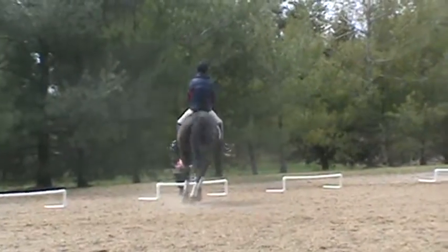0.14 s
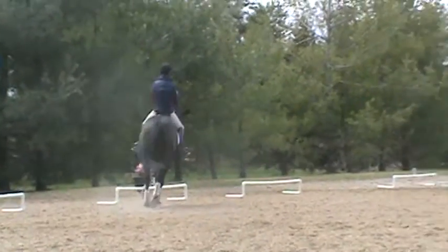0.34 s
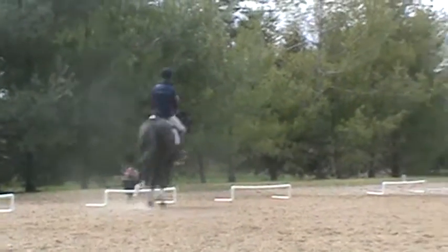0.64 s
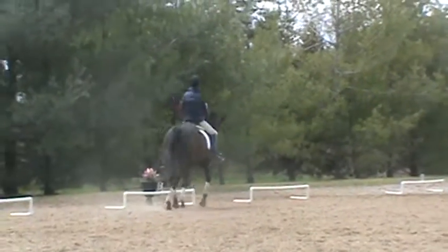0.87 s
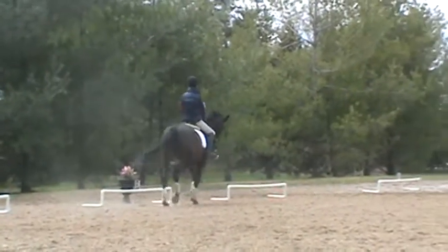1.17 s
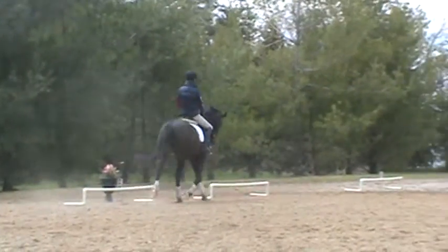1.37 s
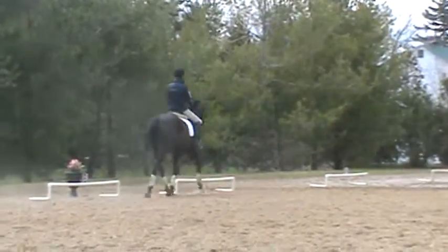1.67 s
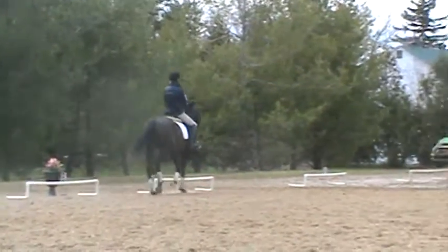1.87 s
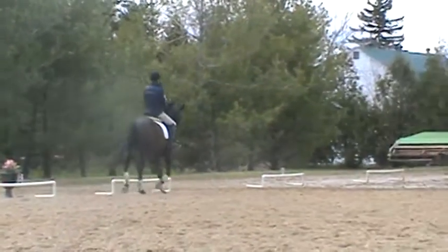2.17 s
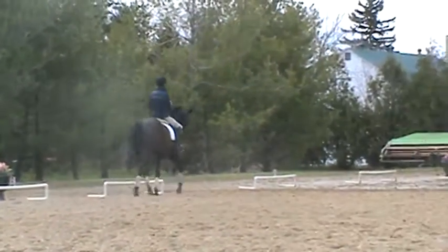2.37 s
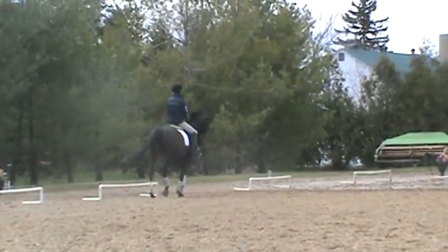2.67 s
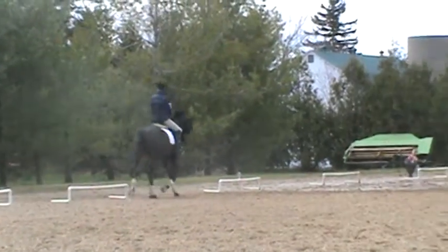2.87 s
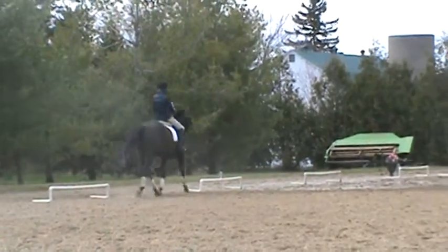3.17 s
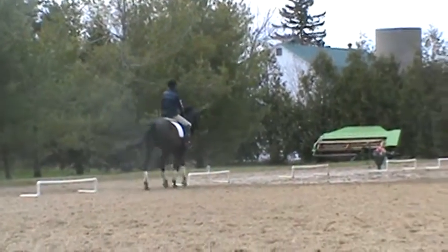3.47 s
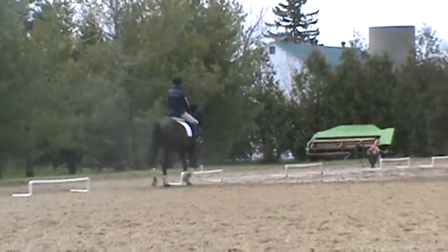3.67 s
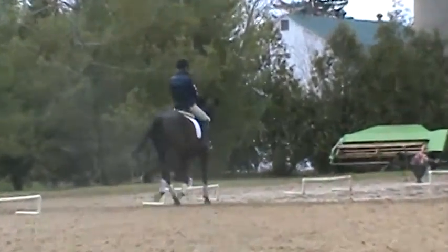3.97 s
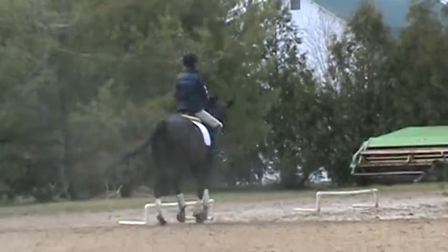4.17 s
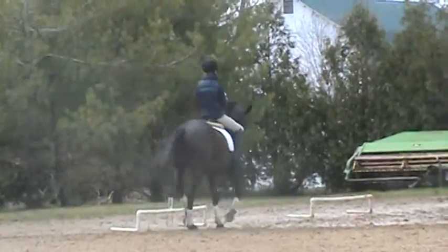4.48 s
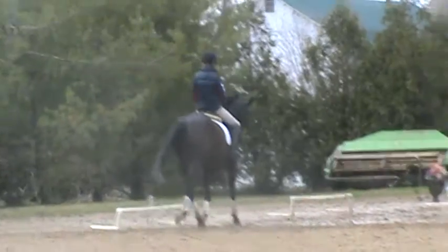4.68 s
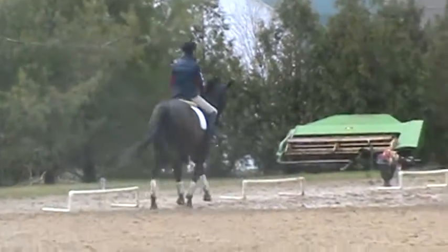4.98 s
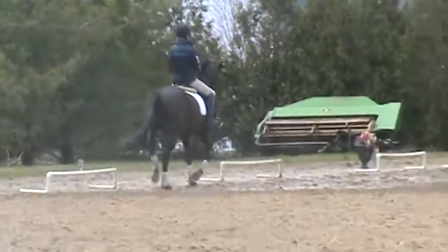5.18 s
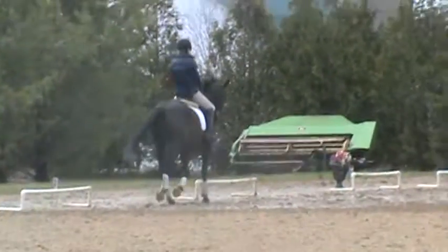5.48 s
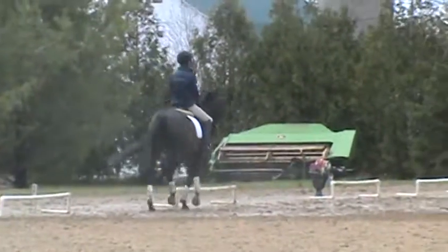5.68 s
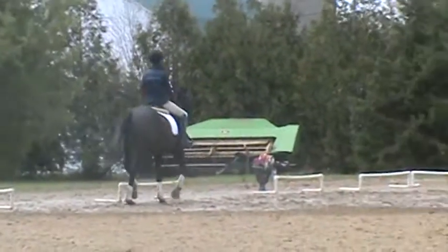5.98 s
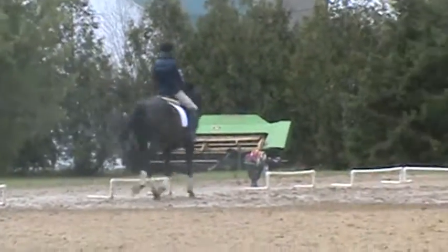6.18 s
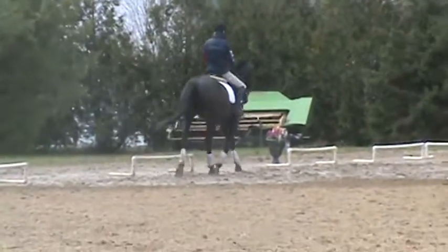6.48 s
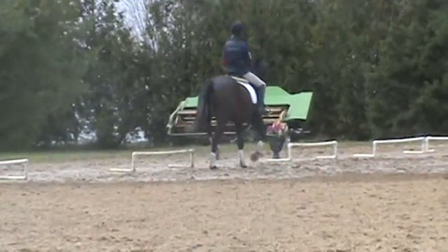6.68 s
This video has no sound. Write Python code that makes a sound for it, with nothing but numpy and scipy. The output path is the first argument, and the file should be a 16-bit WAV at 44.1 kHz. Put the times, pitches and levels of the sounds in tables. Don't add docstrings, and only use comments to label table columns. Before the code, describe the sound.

A quiet outdoor sand arena edged with trees, lasting nearly 7 seconds. A soft far rumble of traffic and wind, a blurred distant flock, steady hiss and a barely audible very high tone run throughout. Small birds on the left, lightly echoed, chirp from the start; a buzzy trill rises at 0.4-0.6 s, a rapid twitter comes near 1.3 s, and squeaky reedy notes at 1.6 and 5.1 s. Whistles and hoarse chips scatter between, including a level whistle at 3.25 s. Soft low hoof thuds are faint and sparse, at about 1.4 and 2.6 s, then firmer at 4.5, 4.9, 6.0, 6.4 and 6.7 s. Close dry case ticks punctuate, clustering around 3.4-3.7 s with one loud crack at 3.65 s, and sharp snaps at 4.8-5.5 s. A sleeve rubs dully at 0.1-0.6 s and rustles brightly from 6 s.

```python
import sys
import numpy as np
from scipy import signal
from scipy.fft import rfft, irfft, next_fast_len
from scipy.io import wavfile

SR = 44100
rng = np.random.default_rng(int(sys.argv[2]) if len(sys.argv) > 2 else 0)


def how_loud(loudness_db):
    steps = np.asarray(loudness_db, float) / 20
    return 10 ** steps


def to_wav(sig):
    pcm = np.clip(np.atleast_2d(sig), -1, 1) * 32767
    pcm = np.round(pcm).astype(np.int16)
    wavfile.write(sys.argv[1], SR, pcm.T)


N = 301582

# freq_hz, density_db
RUMBLE_SPECTRUM = [(15, -47), (25, -13.5), (71, -3.5), (118, -0.5), (166, -6), (204, -4.5), (423, -12),
                   (465, -8), (510, -9.5), (639, -9), (947, -10.5), (1820, -26), (2200, -26), (2860, -49),
                   (4840, -120)]
FLOCK_SPECTRUM = [(1200, -10.5), (2000, -1), (2700, -2.5), (3400, 0), (4200, -4), (5200, -9.5), (7500, -13),
                  (10000, -13.5)]
HISS_SPECTRUM = [(600, -29), (1500, 1.5), (4000, -5), (8000, -5.5), (12000, -5), (15700, -5), (16000, -16)]
HISS_DB = -60
# freq_hz, likeness_0_to_1
FAR_LIKENESS = [(30, 0.998), (70, .992), (150, .99), (500, 0.92), (1000, 0.73), (2000, 0.61), (3500, 0.24),
                (8000, 0.19)]
# freq_hz, lead_rad
FAR_LEAD = [(60, 0.12), (950, -0.86), (1800, -0.95), (4400, 0.12), (9000, -0.00052)]
CASE_LEAD = [(500, -2), (1100, -0.46), (2200, -1.65), (3500, -1.65), (5000, -1.1), (7500, -1.1),
             (11000, 0.7)]
CLOTH_LEAD = [(1000, -0.36), (2200, -0.54), (3500, -0.27), (5000, 0.39), (7500, 1.3), (11000, 1.6)]
# freq_hz, left_minus_right_db
PORT_BIAS = [(60, 0), (180, -0.5), (550, -1), (1650, 2.5), (4970, 5), (15000, 0)]
# freq_hz, level_db
LINE_TONE = [(15735, -72.5)]
# time_s, level_db
RUMBLE_LEVEL = [(0, -51.5), (.9, -52.5), (2.0, -53.5), (3.3, -52), (4.9, -52.5), (5.6, -54), (6.2, -51),
                (6.84, -50.5)]
# time_s, level_db
FLOCK_LEVEL = [(0.0, -53.5), (0.38, -65), (0.61, -55), (0.9, -59), (1.2, -63), (1.54, -55.5), (1.75, -62.5),
               (2.6, -63.5), (3.16, -60.5), (4.3, -63.5), (4.7, -65.5), (5.1, -58), (5.45, -62),
               (5.8, -69.5), (6.25, -57.5), (6.84, -56)]

# start_s, length_s, pitch_hz, level_db
PIPES = [(.31, 0.05, 4050, -65), (1.305, .017, 4680, -59), (1.365, .012, 3000, -58),
         (1.397, .06, 3250, -64), (1.6, .035, 3350, -62), (1.74, .04, 3550, -68), (3.845, .02, 4100, -63),
         (3.685, .012, 4150, -60), (3.75, 0.032, 6800, -68), (5.04, .03, 6600, -66),
         (1.397, 0.013, 2810, -53), (1.512, .013, 3200, -57), (2.055, .014, 4300, -58),
         (2.105, 0.016, 3910, -51.5), (2.12, 0.074, 4280, -67), (2.47, 0.03, 3185, -66),
         (2.74, .029, 4150, -63), (2.81, .025, 3300, -65), (3.066, .017, 9430, -57.5),
         (3.153, .022, 2790, -63), (3.21, 0.015, 2810, -60), (3.51, 0.023, 4135, -60),
         (3.55, 0.036, 4125, -72), (3.757, 0.024, 2740, -64), (4.013, .018, 6100, -68),
         (4.08, .022, 6100, -66), (5.0, 0.071, 3285, -65), (5.078, .039, 3320, -59),
         (5.815, 0.02, 3100, -65), (5.89, 0.071, 3130, -68), (6.74, 0.03, 4000, -59)]
# start_s, length_s, top_hz, level_db
ARCHES = [
    (.81, 0.035, 4140, -57.5),
    (2.432, 0.056, 2580, -67),
    (5.776, 0.029, 4080, -63.5),
]
PIPE_DROOP, ARCH_DROOP = 0.0055, 0.111
# start_s, length_s, start_hz, end_hz, level_db
SLIDES = [(.008, 0.022, 4150, 3800, -57), (.575, .018, 4100, 4150, -57), (2.308, .014, 3600, 2000, -57),
          (2.76, .012, 4400, 3400, -61), (2.46, .025, 2500, 2050, -65), (5.8, .02, 3500, 3050, -60),
          (1.293, 0.031, 3850, 4350, -54), (1.319, 0.022, 4400, 3150, -51.5), (1.34, .022, 3250, 3050, -60),
          (.55, .02, 5100, 5600, -64), (.128, 0.0195, 5900, 6400, -63), (1.275, .02, 4900, 5900, -67),
          (1.648, .02, 3950, 3750, -59), (1.378, 0.016, 3180, 3860, -49.5), (1.51, 0.011, 5700, 5300, -65),
          (1.522, 0.007, 4800, 4400, -58), (1.526, .006, 3900, 3500, -60), (2.335, .1, 2600, 3340, -67),
          (2.5, 0.039, 4370, 3100, -70), (3.478, 0.025, 4450, 4080, -65), (3.728, 0.012, 4500, 6000, -61),
          (3.81, 0.008, 2500, 4200, -53.5), (3.802, .008, 2500, 3600, -60), (3.718, .01, 4200, 5300, -67),
          (4.505, 0.048, 2940, 3560, -59.5), (4.56, 0.053, 4230, 3940, -62.5),
          (4.54, .032, 3300, 2690, -59.5), (4.536, .03, 4400, 6800, -66.5), (4.89, .07, 3100, 3350, -67),
          (5.175, .03, 4600, 4000, -62), (5.21, .02, 3780, 4200, -62), (5.826, 0.04, 2900, 3500, -63),
          (5.866, 0.019, 2900, 2550, -58), (6.8, 0.036, 2860, 3480, -58.5)]
HALFWAY = 0.62
# delay_s, length_s, start_hz, end_hz, level_db
LEAP_PARTS = [(0, .021, 2350, 4150, -4), (.022, 0.033, 4150, 4050, -1.5), (.064, .009, 3600, 2450, 2.5)]
SQUEAK_PARTS = [(0.00095, .009, 6900, 8500, -2.5), (.01, .022, 8500, 9000, -1), (.03, .03, 9050, 9400, -5),
                (.02, 0.074, 3750, 3620, -2.5)]
# start_s, level_db
LEAP_TIMES = [(2.245, -56.5), (3.729, -57)]
SQUEAK_TIMES = [(1.633, -54.5), (5.108, -53.5)]
# start_s, length_s, start_hz, middle_hz, end_hz, level_db
REEDY_HIGH = [
    (1.637, 0.104, 3406, 3466, 3520, -51.5),
    (5.112, .102, 3400, 3364, 3444, -51.5),
]
REEDY_LOW = [(.092, 0.047, 1930, 1947, 1990, -55.5)]
REEDY_THIN = [(2.988, .092, 1895, 1950, 1954, -64)]
STEADY = [
    (1., 0.18, 3360, 3473, 3560, -61),
    (3.25, 0.333, 3610, 3584, 3610, -64),
    (3.27, 0.18, 2430, 2390, 2400, -71),
]
# multiple, level_db
HIGH_TONES = [(1, -2), (2, -17), (3, -10)]
LOW_TONES = [(1, -2), (2, -0.5), (3, -4.5)]
THIN_TONES = [(1, -9), (2, -6), (3, -1.5), (4, -10), (6, -9)]
# start_s, length_s, start_hz, end_hz, buzz_hz, level_db
BUZZES = [
    (.385, .25, 3480, 3680, 180, -53.5),
    (.2, .23, 5900, 6000, 130, -65),
]
# start_s, length_s, centre_hz, level_db
CHIPS = [(.04, 0.061, 3500, -61), (.148, 0.061, 3300, -56), (.654, 0.049, 3200, -54.5),
         (.739, 0.022, 2920, -49.5), (1.207, .021, 2330, -56.5), (2.06, 0.1, 3730, -60),
         (2.299, 0.027, 3050, -57), (2.51, 0.031, 2710, -60), (2.815, 0.037, 3100, -61),
         (2.861, 0.026, 2780, -56.5), (3.242, 0.033, 2780, -57), (3.374, 0.02, 2720, -51.5),
         (3.5, 0.046, 3330, -57), (3.591, 0.025, 2900, -57.5), (3.908, .027, 2960, -57.5),
         (3.959, 0.026, 2640, -57.5), (4.455, 0.035, 3000, -55.5), (4.598, .037, 3020, -58.5),
         (4.692, 0.034, 2980, -63), (5.232, 0.1, 3700, -62), (5.879, 0.062, 3000, -66)]
CHEEPS = [(.4, .22, 7320, -64), (.21, .16, 6000, -63), (1.7, .036, 3570, -55), (1.31, .03, 4600, -62),
          (5.83, .06, 3300, -64), (4.99, .02, 3200, -58), (3.81, 0.0062, 5550, -62),
          (2.315, .08, 4050, -64), (4.17, .022, 1600, -60), (4.7, .02, 2500, -61), (4.69, .03, 3350, -61),
          (5.27, .04, 4200, -64), (2.73, .06, 2050, -66), (.595, .03, 3700, -56), (4.58, .03, 6300, -66),
          (1.431, .18, 3250, -64), (1.461, .014, 3170, -53), (1.932, 0.14, 2600, -67),
          (2.031, .05, 4950, -64), (5.04, .04, 2500, -61), (5.163, .014, 4950, -57)]
RASPS = [
    (3.683, .018, 3500, -62),
    (4.215, 0.019, 4500, -56),
    (4.983, 0.024, 4200, -57),
]
CHIP_WIDTH, CHEEP_WIDTH, RASP_WIDTH = 0.39, 0.1, 0.72

# start_s, attack_s, hold_s, release_s, peak_db
STROKES = [
    (0.118, 0.15, 0.092, 0.3, -47.5),
    (5.974, 0.13, 0.25, 0.11, -48),
    (6.383, 0.06, .23, 0.12, -49),
]
# freq_hz, density_db
CLOTH_SPECTRA = [
    [(250, 4.5), (500, 2), (1200, -0.5), (2500, -4.5), (6000, -17.5), (9000, -29)],
    [(1200, -20), (2200, -4.5), (4000, -3.5), (5200, -6), (10400, -2.5), (12500, -8), (16000, -20)],
    [(1200, -9), (2280, -0.5), (3600, -8), (6200, -4.5), (10700, -10.5), (12700, -5), (16000, -13)],
]
START_DB, END_DB = -15, -11.5
SAG_DB_PER_S = [-14, -21, -13]
BRIGHT_DB = [9, -3, -0.5]
BRIGHT_PER_DB = 0.2
# start_s, length_s, low_hz, high_hz, level_db
TUGS = [
    (6.075, .07, 2800, 7500, -55),
    (6.09, .07, 8000, 12500, -60),
    (6.565, .028, 3500, 7500, -54),
    (6.67, .035, 1900, 3800, -57),
    (6.5, .06, 1900, 3200, -58),
    (6.24, .09, 7000, 10500, -63),
]

# low_hz, high_hz, t60_s
CASE_BANDS = [(740, 1830, 0.048), (1990, 4760, 0.024), (5250, 8700, 0.014), (8900, 12400, 0.0046)]
# freq_hz, level_db, t60_s
CASE_MODES = [(974, 18, 0.0062), (2070, 6.5, 0.0063), (3400, 4.5, 0.0042), (4200, 0.5, 0.0072),
              (5700, 11, 0.0031), (7600, 0, 0.0078)]
# start_s, peak_db, tilt_db_per_band
SNAPS = [(1.6099, -34.5, -1), (1.8688, -44, 3.5), (1.9762, -37.5, -0.5), (3.1078, -35.5, -1),
         (4.796, -32.5, -1), (4.9454, -31.5, 5), (5.3657, -27.5, 2.5), (5.4594, -33.5, -1.5)]
KNOCKS = [(0.6443, -31, 4), (2.6883, -46, 2), (3.063, -44, -1), (3.491, -39.5, -.3), (3.6435, -39, -5),
          (3.6797, -50, -.3), (4.2188, -39, -3), (4.227, -45, 2), (4.235, -46, 3), (4.245, -46, -3),
          (2.64, -49, -1), (2.622, -50, -2), (4.052, -50, -4), (1.639, -48, 4), (5.5318, -47, 1)]
PRICKS = [
    (4.2962, -45, -2),
    (5.1038, -47, -2.5),
    (5.1644, -41.5, -1.5),
]
PINS = [
    (1.3663, -42, -0.5),
    (2.8693, -44.5, 5),
    (6.439, -47, 2),
]
# start_s, peak_db, tilt_db_per_band
CRACK = [(3.6545, -19, 0.0059)]
SNAP_DB = [-14, -0.1, -5.5, -19]
KNOCK_DB = [0.5, 0.5, -12, -14]
PRICK_DB = [-10, 0, -3, 2.5]
PIN_DB = [-30, -18, -3, 1]
CRACK_DB = [-4, 0.7, -6, -13]
# start_s, peak_db
CREAKS = [
    (2.404, -44),
    (2.62, -44),
    (3.428, -42),
    (3.482, -45),
    (3.543, -39),
    (3.563, -40),
    (3.583, -40),
    (3.682, -38),
]
# start_s, freq_hz, peak_db
RINGS = [(3.108, 3000, -42), (3.108, 4760, -38), (3.1085, 5840, -45), (4.7965, 3100, -37),
         (4.7965, 4900, -37), (4.7965, 5490, -47), (4.9455, 3840, -38), (4.9455, 5490, -40),
         (4.9455, 7760, -44), (5.366, 7830, -37), (5.366, 5000, -38), (5.4596, 7700, -48),
         (2.8693, 12500, -42), (2.8693, 9900, -46), (1.3663, 7600, -44), (3.6549, 2600, -22),
         (3.6555, 1100, -25), (4.224, 3900, -48), (4.221, 6000, -52), (4.797, 6920, -48),
         (3.0635, 7500, -55), (1.61, 4900, -41), (0.6445, 3300, -38)]
RING_T60_S = 0.016

# start_s, peak_db, thud_hz
HOOVES = [(0.529, -56, 176.4), (1.444, -39, 159), (2.191, -46, 211), (2.634, -38, 132), (3.056, -55, 215),
          (4.516, -36, 137), (4.891, -31, 255), (5.279, -41, 214), (6.026, -30.5, 234), (6.388, -28.5, 247),
          (6.391, -35, 115), (6.742, -27.5, 232)]
THUD_T60_S = 0.025


def rms_one(x):
    return x / np.sqrt(np.mean(x ** 2) + 1e-20)


def at_hz(points, hz):
    table_hz, values = np.transpose(points)
    return np.interp(np.log(hz), np.log(table_hz), values)


def pan(x, db):
    return x * how_loud(np.array([[db / 2], [-db / 2]]))


def add(out, start_s, x):
    i = max(round(start_s * SR), 0)
    out[..., i:i + x.shape[-1]] += x[..., :N - i]


def drift(rate_hz):
    steps = rng.standard_normal(5000)
    return np.interp(np.arange(N) / SR * rate_hz, np.arange(5000), steps)


def swell(length_s, sharp=0.15, late=0.66):
    u = np.linspace(0, 1, max(round(length_s * SR), 8))
    return u, np.clip(np.sin(np.pi * u ** late), 0, 1) ** sharp


def band(x, low_hz, high_hz):
    edges_hz = [low_hz, min(high_hz, 0.45 * SR)]
    return signal.sosfilt(signal.butter(2, edges_hz, "band", fs=SR, output="sos"), x)


def fft_axis():
    size = next_fast_len(N)
    return size, np.maximum(np.arange(size // 2 + 1) * SR / size, 1)


def coloured(spectrum, likeness):
    size, hz = fft_axis()
    mid, side = rfft(rng.standard_normal((2, size)))
    alike = np.clip(at_hz(likeness, hz), 0, 1)
    inside = (hz > spectrum[0][0]) & (hz < spectrum[-1][0])
    both = np.sqrt(1 + alike) * mid + np.sqrt(1 - alike) * side * np.array([[1], [-1]])
    return rms_one(irfft(both * how_loud(at_hz(spectrum, hz)) * inside, size)[:, :N])


def ports(pair, lead):
    size, hz = fft_axis()
    half = how_loud(at_hz(PORT_BIAS, hz) / 2) * np.exp(0.5j * at_hz(lead, hz))
    return irfft(rfft(pair, size) * np.array([half, 1 / half]), size)[:, :N]


def far_rumble():
    level_db = np.interp(np.arange(N) / SR, *np.transpose(RUMBLE_LEVEL))
    gusts_db = 0.4 * drift(6.4)
    return how_loud(level_db + 1.02 + gusts_db) * coloured(RUMBLE_SPECTRUM, FAR_LIKENESS)


def distant_flock():
    level_db = np.interp(np.arange(N) / SR, *np.transpose(FLOCK_LEVEL))
    swells_db = 1.5 * np.clip(drift(14), -1.5, 1.2)
    return how_loud(level_db - 1.8 + swells_db) * coloured(FLOCK_SPECTRUM, FAR_LIKENESS)


def circuits():
    likeness = [(1500, 0.27), (6000, 0.42), (9000, 0.53), (11000, 0.8), (13500, 0.96), (16000, 0.99)]
    hiss = how_loud(HISS_DB) * coloured(HISS_SPECTRUM, likeness)
    (tone_hz, tone_db), = LINE_TONE
    tone = np.sqrt(2) * np.sin(2 * np.pi * tone_hz * np.arange(N) / SR)
    return hiss + how_loud(tone_db) * tone


def whistles():
    slides = list(SLIDES)
    for phrase, times in [(LEAP_PARTS, LEAP_TIMES), (SQUEAK_PARTS, SQUEAK_TIMES)]:
        for s, db in times:
            for delay_s, length_s, start_hz, end_hz, part_db in phrase:
                slides.append((s + delay_s, length_s, start_hz, end_hz, db + part_db))
    rows = []
    for s, length_s, start_hz, end_hz, db in slides:
        middle_hz = start_hz + HALFWAY * (end_hz - start_hz)
        rows.append((s, length_s, start_hz, middle_hz, end_hz, db))
    for table, droop in [(PIPES, PIPE_DROOP), (ARCHES, ARCH_DROOP)]:
        for s, length_s, hz, db in table:
            rows.append((s, length_s, hz * (1 - droop), hz, hz * (1 - droop), db))
    return rows


def notes(rows, tones, waver=0.017, rough=1.0, late=0.78):
    out, shake = np.zeros(N), drift(160)
    flutter_db = rough * (3.7 * drift(70) + 2.5 * drift(380))
    for s, length_s, *pitch_hz, db in rows:
        u, shape = swell(length_s, sharp=0.2, late=late)
        i = round(s * SR)
        glide_hz = np.polyval(np.polyfit([0, 0.5, 1], pitch_hz, 2), u)
        phase = 2 * np.pi * np.cumsum(glide_hz * (1 + waver * shake[i:i + len(u)])) / SR
        voice = 0
        for k, tone_db in tones:
            j = round(k * SR / 2 + i / 2)
            own_db = flutter_db[j:j + len(u)] if k > 1 else 0
            voice = voice + how_loud(tone_db + own_db) * np.sin(k * phase)
        add(out, s, how_loud(db + 2 + flutter_db[i:i + len(u)]) * shape * voice)
    return out


def buzzes():
    out = np.zeros(N)
    for s, length_s, start_hz, end_hz, buzz_hz, db in BUZZES:
        u, shape = swell(length_s, sharp=0.21)
        beat = 2 * np.pi * np.cumsum(buzz_hz * (1 + 0.41 * drift(200)[:len(u)])) / SR
        hz = (start_hz + (end_hz - start_hz) * u) * (1 + 0.048 * np.sin(beat + 1.7))
        phase = 2 * np.pi * np.cumsum(hz) / SR
        voice = np.sin(phase) + how_loud(-12.5) * np.sin(2 * phase)
        chop = (1 + 0.56 * np.sin(beat)) / 2
        add(out, s, how_loud(db + 6) * shape * chop * voice)
    return out


def chips():
    out = np.zeros(N)
    for rows, width in [(CHIPS, CHIP_WIDTH), (CHEEPS, CHEEP_WIDTH), (RASPS, RASP_WIDTH)]:
        for s, length_s, hz, db in rows:
            noise = band(rng.standard_normal(10000), hz * (1 - width / 2), hz * (1 + width / 2))
            shape = swell(length_s)[1]
            add(out, s, how_loud(db) * shape * rms_one(noise)[-len(shape):])
    return out


def trees(x, t60_s=0.35):
    t = np.arange(round(0.4 * SR)) / SR
    tail = rng.standard_normal((2, len(t))) * how_loud(-60 * t / t60_s) * (t > 0.012)
    return signal.fftconvolve(x[None], tail / np.sqrt(np.sum(tail[0] ** 2)), axes=1)[:, :N]


def birds():
    pure = [(0.99, 0)]
    clear = notes(whistles(), pure)
    clear += notes(REEDY_HIGH, HIGH_TONES, waver=0.0026, rough=0.71, late=1.2)
    clear += notes(REEDY_LOW, LOW_TONES, waver=0.006, rough=0.6, late=1.6)
    clear += notes(REEDY_THIN, THIN_TONES, waver=0.0083, rough=0.9)
    clear += notes(STEADY, pure, waver=0.004, rough=0.21, late=2.1)
    hoarse = buzzes() + chips()
    return pan(clear, 10.0) + pan(hoarse, 5.6) + how_loud(-4.5) * trees(clear + hoarse)


def tugs():
    out = np.zeros((2, N))
    for s, length_s, low_hz, high_hz, db in TUGS:
        shape = swell(length_s, sharp=0.7, late=0.9)[1]
        rustle = rms_one(band(rng.standard_normal(6000), low_hz, high_hz))
        add(out, s, how_loud(db) * shape * rustle[-len(shape):])
    return out


def sleeve():
    out, t = tugs(), np.arange(N) / SR
    likeness = [(1000, 0.69), (5000, 1.0), (8000, 0.92), (12000, 0.45)]
    treble = signal.butter(2, 6000, "high", fs=SR, output="sos")
    for stroke, sag, top_db, spectrum in zip(STROKES, SAG_DB_PER_S, BRIGHT_DB, CLOTH_SPECTRA):
        s, attack_s, hold_s, release_s, db = stroke
        corners_s = np.cumsum([s, attack_s, hold_s, release_s])
        speed_db = np.interp(t, corners_s, [START_DB, 0, sag * hold_s, sag * hold_s + END_DB])
        grain_db = 1.2 * drift(140) + 0.5 * drift(22)
        noise = coloured(spectrum, likeness) * how_loud(grain_db)
        top = signal.sosfilt(treble, noise)
        moving = (t > corners_s[0]) & (t < corners_s[-1])
        top_gain = how_loud(top_db + BRIGHT_PER_DB * speed_db) - 1
        out = out + moving * how_loud(db + speed_db) * (noise + top_gain * top)
    return ports(out, CLOTH_LEAD)


def creaks():
    out, t = np.zeros((2, N)), np.arange(round(0.03 * SR)) / SR
    for s, peak_db in CREAKS:
        rise = 1 - np.exp(-t / 0.00093)
        add(out, s, how_loud(peak_db + 4.0 - 60 * t / 0.016) * rise * np.sin(2 * np.pi * 1000 * t))
    return out


def rings():
    out, t = np.zeros((2, N)), np.arange(round(0.03 * SR)) / SR
    for s, hz, peak_db in RINGS:
        rise = 1 - np.exp(-t / 0.00026)
        add(out, s, how_loud(peak_db - 60 * t / RING_T60_S) * rise * np.sin(2 * np.pi * hz * t))
    return out


def taps():
    kinds = [(SNAPS, SNAP_DB), (KNOCKS, KNOCK_DB), (PRICKS, PRICK_DB), (CRACK, CRACK_DB), (PINS, PIN_DB)]
    steps = np.arange(len(CASE_BANDS)) - 1
    return [(s, db, shares_db + tilt_db * steps) for rows, shares_db in kinds for s, db, tilt_db in rows]


def ticks():
    out, t = creaks() + rings(), np.arange(round(0.051 * SR)) / SR
    for s, peak_db, shares_db in taps():
        mid, side = rng.standard_normal((2, len(t)))
        burst = mid + 0.15 * side * np.array([[1], [-1]])
        burst[:, 12] += 1.5
        turns, extras = rng.random((2, len(CASE_MODES)))
        for (hz, db, t60_s), turn, extra in zip(CASE_MODES, turns, extras):
            decay = how_loud(db + 2 * extra - 60 * t / t60_s)
            burst = burst + decay * np.sin(2 * np.pi * (hz * t + turn))
        for (low_hz, high_hz, t60_s), share_db in zip(CASE_BANDS, shares_db):
            envelope = how_loud(-60 * t / t60_s) * np.minimum(t / 0.00057, 1)
            part = band(burst * envelope, low_hz, high_hz)
            part = band(part, 1.16 * low_hz, 1.23 * high_hz)
            add(out, s, rms_one(part) * how_loud(peak_db + share_db - 21.0))
    return pan(ports(out, CASE_LEAD), -1.8)


def hooves():
    out, t = np.zeros(N), np.arange(round(0.08 * SR)) / SR
    for s, peak_db, hz in HOOVES:
        rise = 1 - np.exp(-t / 0.0026)
        decay = how_loud(peak_db + 4.5 - 60 * t / THUD_T60_S)
        add(out, s + 0.0028, decay * rise * np.sin(2 * np.pi * hz * t))
    return pan(out, -1.6)


def scene():
    far = ports(far_rumble() + distant_flock(), FAR_LEAD)
    return far + circuits() + birds() + sleeve() + ticks() + hooves()


def top_cut(x):
    return signal.sosfilt(signal.butter(12, 16830, fs=SR, output="sos"), x)


def record(dry):
    return top_cut(dry)


dry = scene()
out = record(dry)
to_wav(out)
```